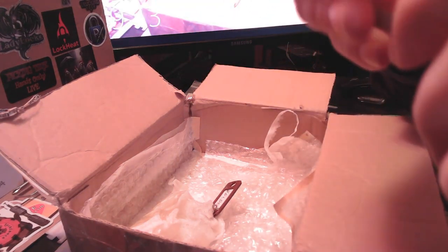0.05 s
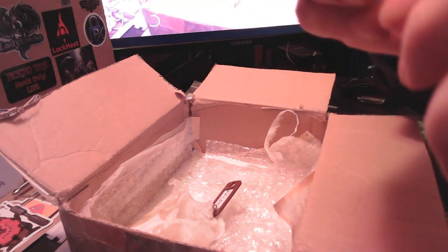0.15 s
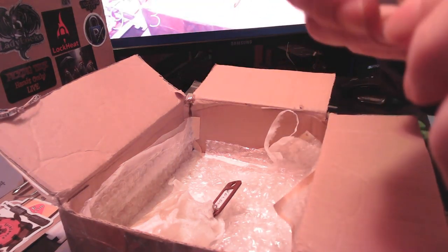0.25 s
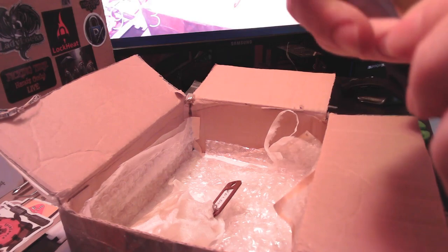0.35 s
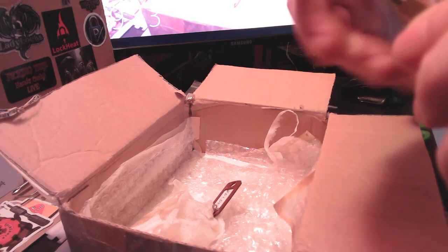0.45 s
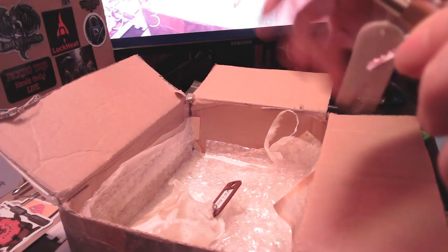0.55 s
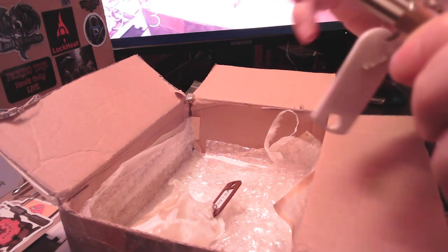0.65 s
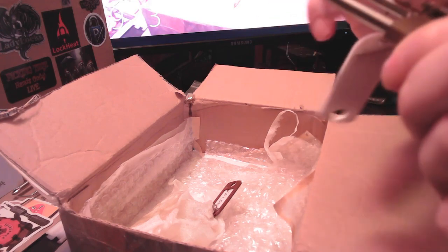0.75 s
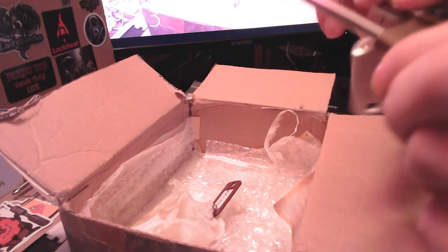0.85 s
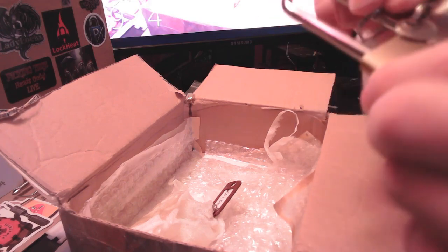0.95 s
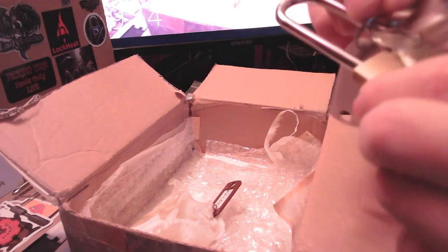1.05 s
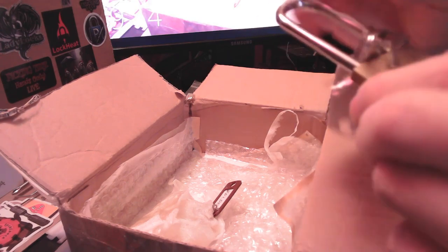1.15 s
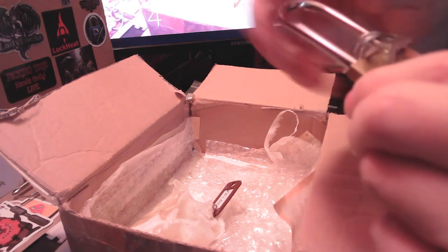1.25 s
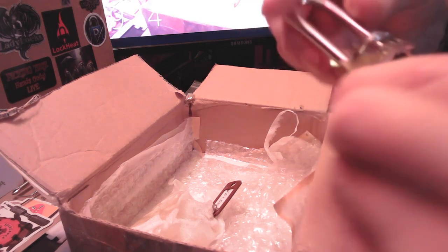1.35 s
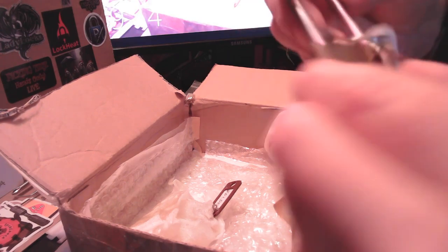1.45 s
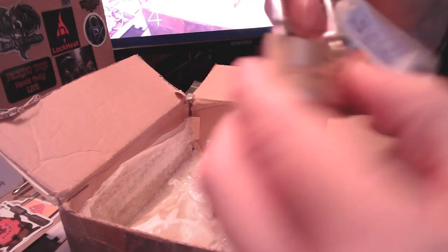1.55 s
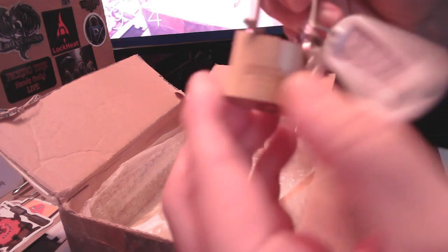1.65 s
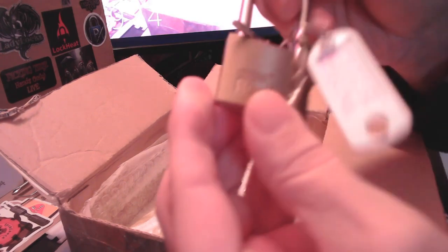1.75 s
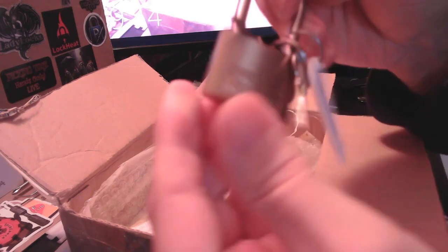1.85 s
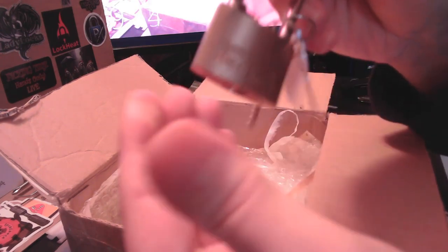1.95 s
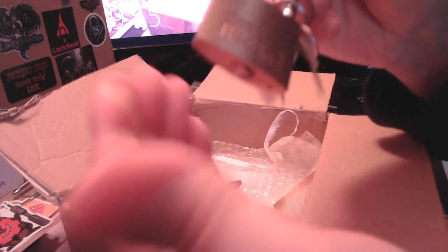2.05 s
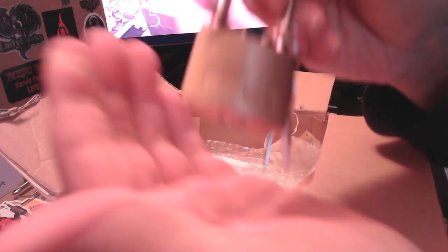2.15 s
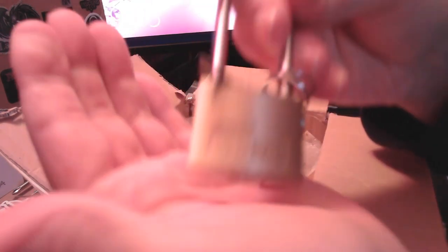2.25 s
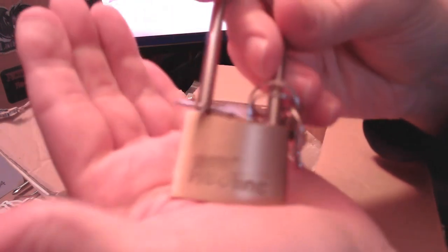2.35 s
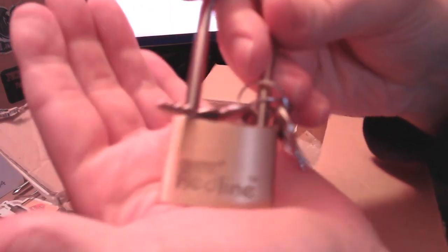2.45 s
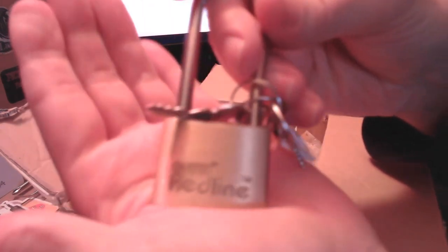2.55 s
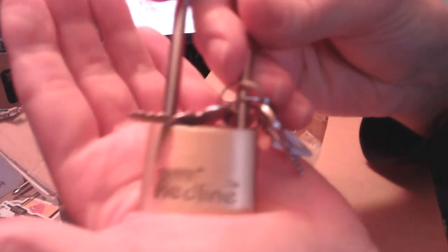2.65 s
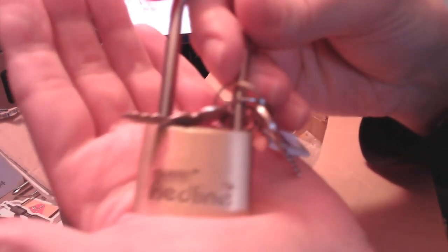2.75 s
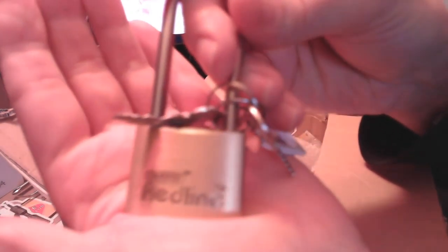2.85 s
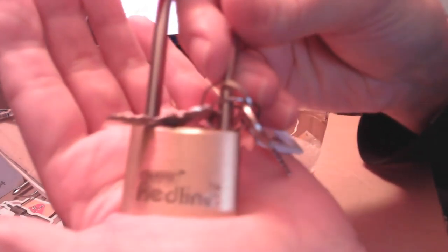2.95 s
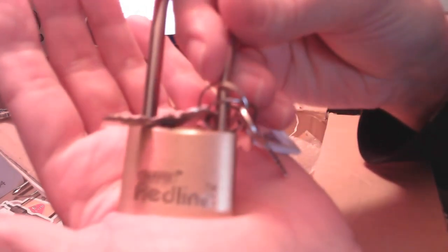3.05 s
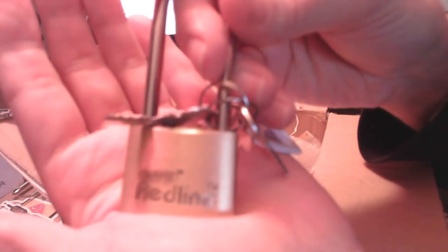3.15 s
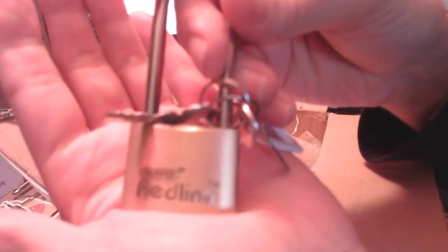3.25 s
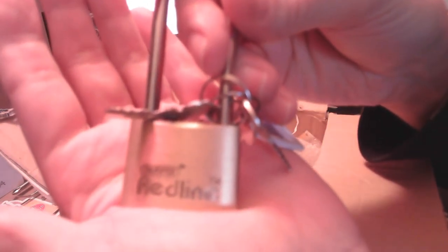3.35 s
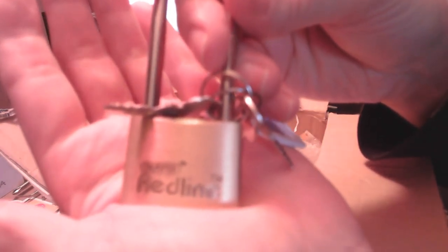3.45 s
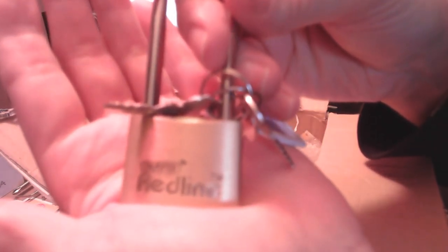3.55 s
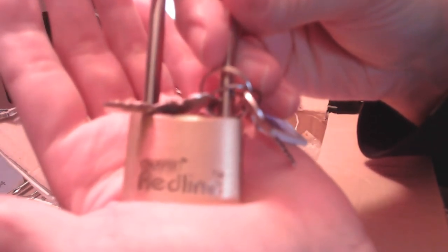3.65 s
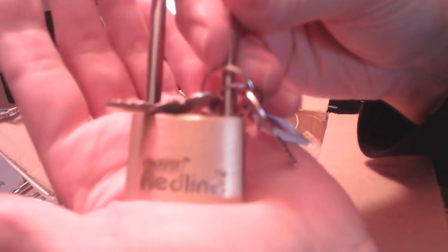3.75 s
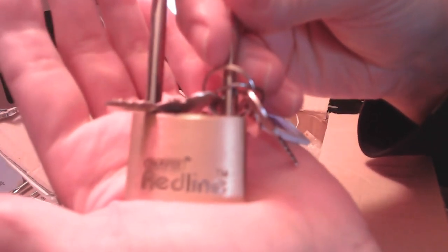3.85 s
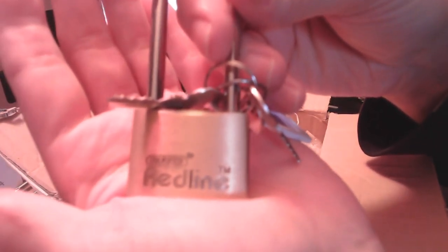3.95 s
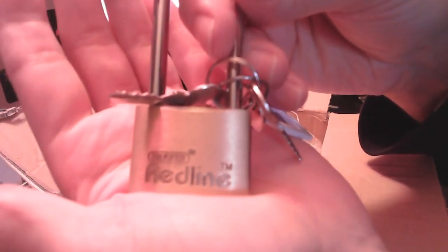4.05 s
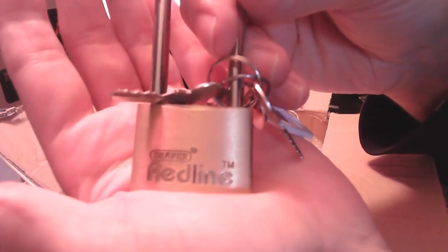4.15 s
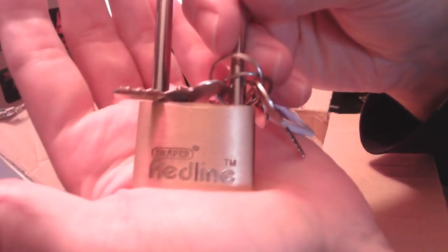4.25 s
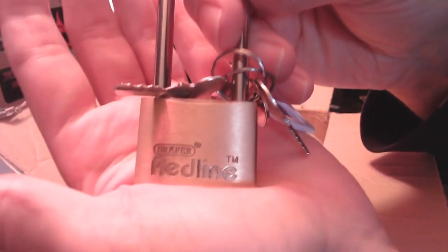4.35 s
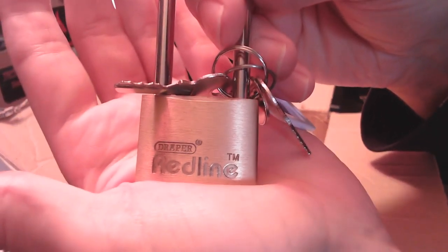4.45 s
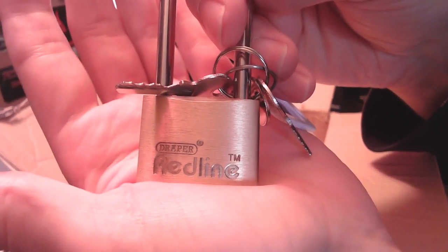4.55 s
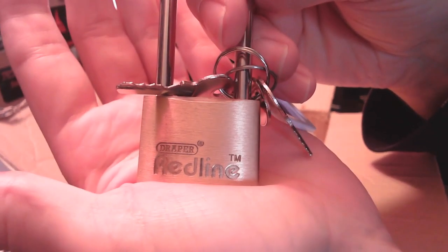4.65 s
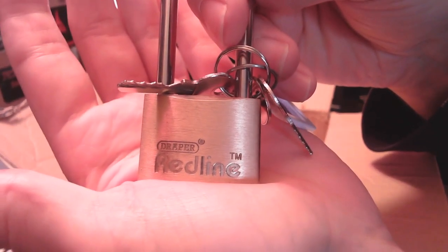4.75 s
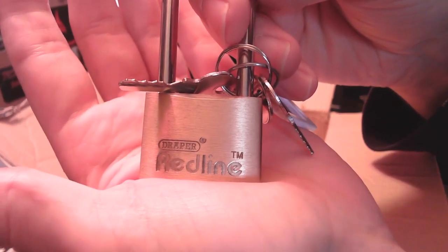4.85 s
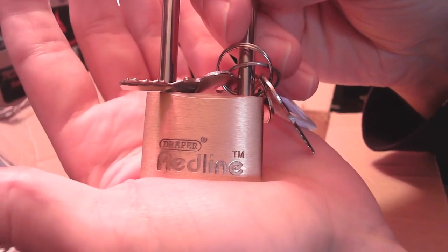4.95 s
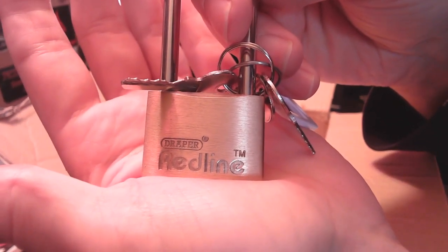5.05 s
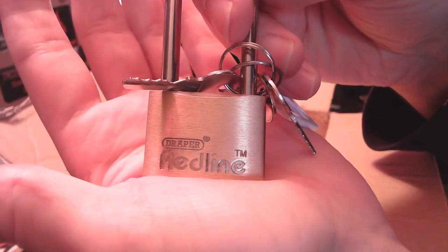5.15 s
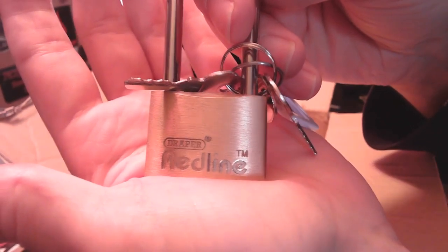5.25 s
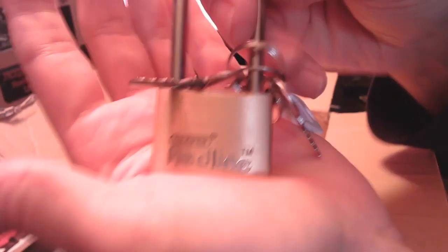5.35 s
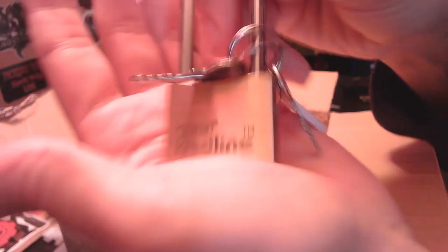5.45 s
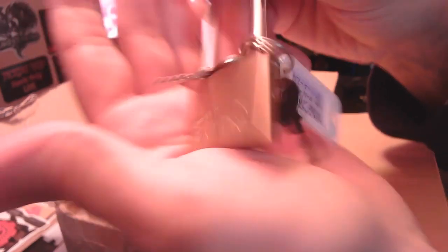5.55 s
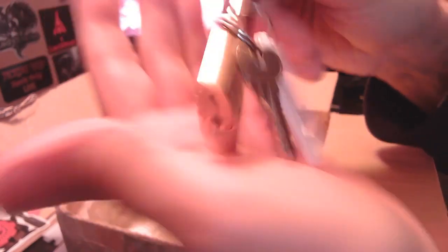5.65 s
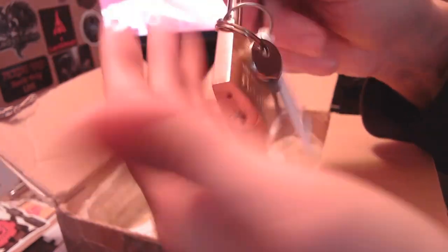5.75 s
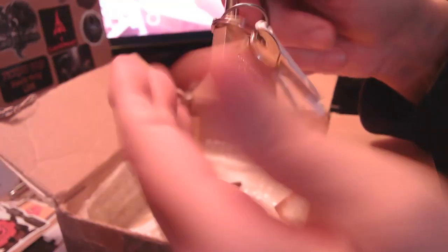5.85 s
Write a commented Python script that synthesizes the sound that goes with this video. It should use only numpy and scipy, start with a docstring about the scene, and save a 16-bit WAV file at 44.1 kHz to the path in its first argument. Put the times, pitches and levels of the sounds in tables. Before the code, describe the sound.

Close up in a small room, a bunch of keys clinks and slides with thin, bright, quickly fading rings while a hand-held padlock clacks dully. About halfway through, the metal goes still, leaving only the faint low hum and fan rush of a computer. Near the end the keys and lock rattle together once more in a short burst.

```python
"""Padlock and keys in the hands

A small brass padlock with keys on a ring is turned over close to the microphone, above a cardboard box.
The keys clink as they hit each other and scrape as they slide. The lock knocks dully because the hand
stops it from ringing. Fingers rub the metal, and the moving hands push a little air.
Behind it all, a computer's motors hum and its fan rushes in a small room."""
import sys
import numpy as np
from scipy import signal
from scipy.fft import rfft, irfft, next_fast_len
from scipy.io import wavfile

SR = 44100
rng = np.random.default_rng(int(sys.argv[2]) if len(sys.argv) > 2 else 0)


def to_wav(s):
    """Save 16-bit WAV."""
    ch = np.atleast_2d(s).T  # columns
    pcm = np.round(np.clip(ch, -1, 1) * 32767)  # PCM
    wavfile.write(sys.argv[1], SR, pcm.astype(np.int16))


N = 260039
TIME = np.arange(N) / SR

# The computer's motor tones: pitch_hz, level_db
MOTOR_TONES = [(84, -60), (119.6, -54), (361, -54.5), (619, -76.5), (1083, -78), (1444, -78), (2116, -79.5)]
# The tone colour (strength from low to high pitch) of the fan and room noise: pitch_hz, relative_db
FAN_COLOUR = [(25, 0.5), (32, 3), (45, 3.5), (62, 0), (85, -1.5), (102, -14), (125, -4), (150, -13.5),
              (300, -14.5), (640, -22.5), (1600, -28), (2400, -32), (6000, -41.5), (16000, -52)]
# How alike that noise is on the left and right: pitch_hz, likeness (1 means the same)
FAN_LIKENESS = [(30, .9), (100, 0.91), (300, 0.9), (700, 0.81), (1500, 0.56), (4000, 0.21), (12000, 0.067)]
# Hand movements that push air: start_s, length_s, relative_db
HAND_SWEEPS = [(0.0, 0.084, -32), (0.19, 0.092, -36), (0.63, 0.097, -28), (1.2, 0.16, -31.5),
               (1.92, 0.092, -35.5), (2.96, .1, -41), (4.08, .04, -43), (4.91, 0.15, -35.5),
               (5.58, 0.11, -28)]
# Keys hitting each other, with levels relative within each column:
# start_s, key_name, tick_db, middle_db, top_db, ring_s (time to fade by 60 dB)
KEY_HITS = [(0.1075, "B", -55.5, -66, -54.5, 0.064), (0.157, "A", -50.5, -60, -57, .05),
            (0.2006, "B", -59.5, -63, -66, 0.13), (0.47, "D", -53, -47, -48, .15),
            (0.5405, "A", -53, -51, -44, .11), (0.5956, "D", -41.5, -40, -35, 0.033),
            (0.6205, "B", -54, -49, -48, 0.089), (0.6872, "A", -61, -61, -49, 0.14),
            (0.7565, "A", -51, -61, -41.5, .11), (1.04, "A", -51.5, -54.5, -51, 0.044),
            (1.215, "B", -43, -37.5, -37, 0.067), (1.2354, "A", -43, -37.5, -33, 0.034),
            (1.2743, "D", -41.5, -41, -39, 0.023), (1.4075, "D", -45, -41, -30, 0.091),
            (1.4356, "A", -59, -36, -33, 0.25), (1.469, "A", -39, -42, -30.5, 0.11),
            (1.5024, "A", -44, -40, -40, 0.18), (1.6638, "B", -51, -59, -50, 0.046),
            (1.72, "B", -47, -53, -53, 0.017), (1.7737, "D", -51, -51, -47, 0.045),
            (1.812, "A", -48.5, -53, -43, .08), (1.831, "C", -48.5, -54, -42, 0.05),
            (2.191, "C", -51, -49, -51, .03), (2.2026, "C", -37, -42, -35.5, 0.084),
            (2.216, "C", -39.5, -43, -42, 0.063), (2.223, "C", -60, -36.5, -50, 0.15),
            (2.2487, "A", -49, -58, -40, .085), (2.616, "D", -41, -46, -39, 0.035),
            (2.673, "D", -48, -65, -55, .05), (2.725, "B", -44.5, -65, -48.5, .035),
            (5.7321, "C", -43.5, -50, -44, .053), (5.7675, "A", -48, -49, -49, .089),
            (5.788, "A", -50, -57, -45, 0.022), (5.8107, "B", -37.5, -39, -32.5, 0.14),
            (5.819, "B", -43, -50, -50, 0.067), (5.858, "D", -43.5, -40, -44, 0.17),
            (5.8795, "A", -43, -38, -44, 0.074)]
# The four keys, by name: middle_pitch_hz, top_pitch_hz, bending_db (compared with the other keys)
KEY_VOICES = {"A": (10600, 11995, -9.5), "B": (10540, 12540, -0.91), "C": (10343, 12465, -7),
              "D": (10660, 12690, -15.5)}
# Three groups of tones that keys ring with, low to high: pitch_hz, relative_db, share_of_ring_time
BENDING_TONES = [(3790, -5, .7), (3870, 0, 1.0), (3960, -2, .9), (4090, -7, .6)]
MIDDLE_TONES = [(10343, -7, 1.0), (10440, -10, .5), (10540, -3, .9), (10600, 0, 1.1), (10750, -7, .5)]
TOP_TONES = [(11995, 0, 1.1), (12060, -6, .7), (12150, -2, .8), (12320, -6, .5), (12470, -3, .9),
             (12545, 0, 1.1), (12650, -3, .8), (12720, -2, .9), (12960, -5, .5), (13200, -9, .5)]
# The tone colour of one key touching another: pitch_hz, relative_db
TICK_COLOUR = [(600, -20.5), (1500, -11), (3100, -5.5), (3750, 6.5), (5200, -1), (7000, 2.5), (9000, -0.5),
               (11200, -4.5), (13200, -27.5), (14200, 2.5), (16000, 0)]
# Keys sliding in the bunch: start_s, length_s, relative_db, looseness_db (how freely they ring)
KEY_SLIDES = [(0.12, .015, -62.5, -7), (0.469, 0.16, -56.5, 2.5), (0.694, .04, -58.5, 0),
              (0.75, 0.017, -54, 1.5), (0.84, 0.09, -64.5, -14), (1.19, 0.062, -54.5, 1.5),
              (1.22, 0.033, -47.5, -7), (1.32, 0.054, -60.5, -11), (1.428, .1, -49, 2),
              (1.458, 0.017, -40, 0), (1.626, 0.096, -59.5, -2), (1.73, 0.046, -47.5, -9),
              (1.883, 0.073, -56, -9), (2.092, 0.08, -63, -5), (2.224, 0.042, -57, -5),
              (2.39, 0.27, -58.5, -13), (2.614, 0.11, -52.5, -4.5), (3.66, .03, -67.5, -18),
              (5.691, 0.036, -52, -14), (5.76, .05, -58, -6), (5.837, 0.037, -42.5, -4.5)]
# The lock's body, shackle (its metal loop) and tag knocking: start_s, relative_db,
# place (0 thud, 1 clack, 2 shackle, 3 edge), falloff_db (lost per step away from that place)
LOCK_HITS = [(0.3968, -55, 2.0, 18), (0.8208, -64, 2.8, 13), (0.8565, -45, 3.1, 4.1),
             (0.8716, -48, 1.4, 12), (0.9244, -43, 1.96, 3), (1.912, -44.5, 1.55, 2),
             (1.9541, -38, 3.23, 10), (1.9715, -48, 1.45, 11), (2.0247, -60, 2.0, 3),
             (2.0499, -48.5, 2.6, 10), (2.085, -56.5, 2.7, 8.6), (2.326, -55, 2.6, 5.4),
             (2.3483, -40.5, 0.83, 11), (2.37, -55.5, 1.2, 6), (2.4084, -48, 0.61, 12),
             (2.461, -49.5, 2.9, 3.7), (2.4832, -44, 2, 3.5), (2.5967, -32.5, 2.56, 10.5),
             (2.606, -49, 2.1, 12), (2.643, -52, 1.5, 7), (2.6912, -47.5, 2.2, 9.1), (2.7447, -45, 3, 11),
             (2.778, -49.5, 2.7, 9.3), (2.899, -60, 2.45, 5.5), (3.2295, -51, 0.1, 15),
             (5.639, -54, 1.9, 3.4), (5.6544, -50, 2.8, 8), (5.6957, -49, 1.76, 7),
             (5.7194, -39.5, 1.12, 13), (5.7381, -44, 2.9, 10), (5.7458, -44.5, 1.27, 12),
             (5.7674, -54, 1.1, 10), (5.864, -51.5, 1.4, 5.4)]
# The tone colours of those four places: pitch_hz, relative_db
THUD_COLOUR = [(300, -4), (550, 1.5), (800, -5), (1100, 6), (1750, 0.5), (2100, -2), (3000, -32)]
CLACK_COLOUR = [(1200, -17), (1850, -4), (2300, 6), (2600, 4), (3000, -6), (4200, -12)]
SHACKLE_COLOUR = [(2300, -35), (3100, -12), (3700, -2.5), (4400, -4.5), (5200, -2.5), (6200, -5),
                  (7600, -9.5), (10000, -24)]
EDGE_COLOUR = [(6500, -19.5), (9000, -3.5), (11200, -4), (12800, 2), (14500, -14), (16000, -5.5)]
# Skin rubbing on the lock: start_s, length_s, level_db
FINGER_RUBS = [(1.87, 0.12, -62), (2.25, 0.022, -64.5)]


def from_db(db):
    """Turn decibels into a number to multiply a sound by."""
    return 10 ** (np.asarray(db) / 20)


def unit_level(x):
    """Scale a sound so that its average power is 1."""
    return x / np.sqrt(np.mean(x ** 2) + 1e-20)


def unit_energy(x):
    """Scale a short sound so that each channel's total energy is 1."""
    return x / np.sqrt(np.sum(x ** 2, axis=-1, keepdims=True) + 1e-20)


def at_hz(table, hz):
    """Read a table at any pitch, blending between its rows."""
    known_hz, values = np.transpose(table)
    return np.interp(np.log(hz + 1), np.log(known_hz), values)


def add(out, start_s, sound):
    """Mix a sound in at its start time."""
    start = round(start_s * SR)
    out[:, start:start + sound.shape[-1]] += sound[..., :N - start]


def convolve(x, response):
    """Let every sample of x set off its own copy of a ring or an echo."""
    return signal.fftconvolve(np.atleast_2d(x), np.atleast_2d(response), axes=-1)[:, :N]


def narrow_noise(low_hz, high_hz):
    """Make noise that lies between two pitches."""
    band = signal.butter(2, [low_hz, high_hz], "band", fs=SR, output="sos")
    return unit_level(signal.sosfilt(band, rng.standard_normal(N + SR))[SR:])


def movements(rows, rise_db_per_s, fall_db_per_s):
    """Make a loudness curve: each movement swells, holds and fades, and the strongest one leads."""
    curve = np.zeros(N)
    for start_s, length_s, db in rows:
        before_db = rise_db_per_s * np.maximum(start_s - TIME, 0)
        after_db = fall_db_per_s * np.maximum(TIME - start_s - length_s, 0)
        curve = np.maximum(curve, from_db(db - np.minimum(before_db + after_db, 120)))
    return curve


def computer(fan_db=-48, waver_radians=0.033):
    """Motors hum with slightly wavering tones over the smooth rush of a fan."""
    hum = np.zeros(N)
    for hz, db in MOTOR_TONES:
        phase = waver_radians * narrow_noise(0.9, 5.54) + rng.uniform(0, 2 * np.pi)
        hum += from_db(db) * np.sqrt(2) * np.sin(2 * np.pi * hz * TIME + phase)
    size = next_fast_len(N)
    hz = np.fft.rfftfreq(size, 1 / SR)
    shared, side = rfft(rng.standard_normal((2, size)))
    alike = at_hz(FAN_LIKENESS, hz)
    stereo = np.sqrt(1 + alike) * shared + np.sqrt(1 - alike) * side * [[1], [-1]]
    rush = irfft(from_db(at_hz(FAN_COLOUR, hz)) * stereo, size)[:, :N]
    return hum + from_db(fan_db) * unit_level(rush)


def pushed_air(left_db=0.4, right_db=-3.4):
    """The hands push slow waves of air against the microphones, almost too low to hear."""
    phase = np.angle(signal.hilbert(narrow_noise(17, 18)))
    wave = np.sqrt(2) * np.cos(phase)
    sweeps = movements(HAND_SWEEPS, rise_db_per_s=162, fall_db_per_s=162)
    air = wave * np.maximum(sweeps, from_db(-60))  # the air is never quite still
    lows_only = signal.butter(4, 25, fs=SR, output="sos")
    return signal.sosfiltfilt(lows_only, air) * from_db([[left_db], [right_db]])


def snap(colour, size=1024):
    """An object that barely rings answers a tap with one click of this tone colour."""
    strengths = from_db(at_hz(colour, np.fft.rfftfreq(size, 1 / SR)))
    # These two steps pack the click's energy at its very start.
    cepstrum = irfft(np.log(strengths))
    click = irfft(np.exp(rfft(2 * cepstrum[:size // 2], size)))
    return unit_energy(click)


def contact(colour, bounce_db, bounce_s, size=2048):
    """One hard touch is followed by uneven bounces that die away quickly."""
    bounces = rng.standard_normal(size) * rng.exponential(1, size) ** 2
    fade = from_db(-60 * TIME[:size] / bounce_s)
    force = from_db(bounce_db) * unit_energy(bounces * fade)
    force[0] += 1  # the first touch
    return unit_energy(signal.fftconvolve(force, snap(colour))[:size])


def ringing(tones, ring_s, vary_db=0, detune_hz=0, stereo_radians=1.0, size=13000):
    """Struck metal rings with tones that start together and fade; each touch varies them."""
    t = TIME[:size]
    hz, db, share = np.transpose(tones)[:, :, None]
    hz = hz + detune_hz * rng.standard_normal(hz.shape)
    db = db + vary_db * rng.standard_normal(hz.shape)
    fade_s = max(ring_s, 0.015) * share
    height = from_db(db - 60 * t / fade_s) / np.sqrt(fade_s)
    angle = 2 * np.pi * hz * t
    # Each microphone lies in its own direction, so it meets each wave at a different point.
    shift = stereo_radians * rng.standard_normal((2, len(hz)))
    sines, cosines = height * np.sin(angle), height * np.cos(angle)
    return unit_energy(np.cos(shift) @ sines + np.sin(shift) @ cosines)


def struck_key(hz, tones, ring_s, neighbours_db):
    """The struck key rings at its own pitch; the rest of the bunch joins in more briefly."""
    own = ringing([(hz, 0, 1)], ring_s)
    neighbours = ringing(tones, ring_s * 0.43, vary_db=4, detune_hz=68.6)
    return unit_energy(own + from_db(neighbours_db) * neighbours)


def key_clinks(tick_gain_db=24.5, bending_gain_db=23, middle_gain_db=27.5, top_gain_db=28.5):
    """Keys hit with a bright tick, then ring until their neighbours quiet them."""
    out = np.zeros((2, N))
    for start_s, key, tick_db, middle_db, top_db, ring_s in KEY_HITS:
        middle_hz, top_hz, bending_db = KEY_VOICES[key]
        tick = contact(TICK_COLOUR, bounce_db=11.5, bounce_s=0.042)
        bending = ringing(BENDING_TONES, ring_s, vary_db=2, detune_hz=129.6)
        middle = struck_key(middle_hz, MIDDLE_TONES, ring_s, neighbours_db=-2)
        top = struck_key(top_hz, TOP_TONES, ring_s, neighbours_db=-3)
        add(out, start_s, from_db(tick_db + tick_gain_db) * tick)
        add(out, start_s, from_db(tick_db + bending_db + bending_gain_db) * bending)
        add(out, start_s, from_db(middle_db + middle_gain_db) * middle)
        add(out, start_s, from_db(top_db + top_gain_db) * top)
    return out


def sliding_keys(touches_per_s=800, spread_db=3.5, catch_db=2.5, easy_slide_db=-56):
    """Key teeth and the key ring slip over each other in tiny touches that keep the keys ringing."""
    sizes = from_db(spread_db * np.minimum(rng.exponential(1, N), 3.5)) * rng.choice([-1, 1], N)
    catching = from_db(catch_db * narrow_noise(15, 60))  # the keys catch and slip unevenly
    touches = unit_level(sizes * catching * (rng.random(N) < touches_per_s / SR))
    scrapes, shakes = [], []
    for start_s, length_s, db, looseness_db in KEY_SLIDES:
        extra_db = 0.35 * (db - easy_slide_db)  # a harder slide shakes the keys loose
        scrapes.append((start_s, length_s, db))
        shakes.append((start_s, length_s, db + extra_db + looseness_db))
    slopes = dict(rise_db_per_s=376.5, fall_db_per_s=226)
    scrape = touches * movements(scrapes, **slopes)
    shake = touches * movements(shakes, **slopes)
    out = from_db(-2) * convolve(scrape, snap(TICK_COLOUR))
    layers = [(scrape, -16.5, BENDING_TONES), (shake, -10, MIDDLE_TONES), (shake, 0, TOP_TONES)]
    for force, db, tones in layers:
        # Keys that stay in touch quiet each other, so they ring only briefly.
        ring = ringing(tones, ring_s=0.039, vary_db=1.5, stereo_radians=1.2)
        out = out + from_db(db) * convolve(force, ring)
    return out


def lock_knocks(gain_db=25):
    """The hand muffles the lock, so it knocks dryly; where it is hit sets the mix of four colours."""
    out = np.zeros((2, N))
    hz = np.linspace(200, 16000, 80)
    places = (THUD_COLOUR, CLACK_COLOUR, SHACKLE_COLOUR, EDGE_COLOUR)
    shapes = unit_energy(from_db([at_hz(colour, hz) for colour in places]))
    for start_s, db, place, falloff_db in LOCK_HITS:
        steps_away = np.abs(np.arange(len(places)) - place)
        power = from_db(db - falloff_db * steps_away) ** 2 @ shapes ** 2
        colour = np.transpose([hz, 10 * np.log10(power)])
        knock = contact(colour, bounce_db=-10, bounce_s=0.012)
        add(out, start_s, from_db(gain_db) * np.sqrt(power.sum()) * knock)
    return out


def rubbing_fingers():
    """Fingers slide along the lock with a soft, dull rustle."""
    rustle = narrow_noise(low_hz=480, high_hz=620)
    return rustle * movements(FINGER_RUBS, rise_db_per_s=220, fall_db_per_s=220)


def small_room(x, near_db=-5, near_s=0.057, room_db=-13, room_s=0.22, lag_s=0.000031, tilt_db=1.5):
    """Sound bounces quickly off the hands, box and screen, then faintly around the room."""
    t = TIME[:16000]
    near = unit_energy(rng.standard_normal((2, len(t))) * from_db(-60 * t / near_s) * (t > 0.0005))
    room = unit_energy(rng.standard_normal((2, len(t))) * from_db(-60 * t / room_s) * (t > 0.007))
    echoes = convolve(x, from_db(near_db) * near + from_db(room_db) * room)
    # The left microphone is a little nearer, so the right side is later and quieter.
    delay = np.exp(-2j * np.pi * np.fft.rfftfreq(N, 1 / SR) * lag_s)
    direct = np.array([x[0], irfft(rfft(x[1]) * delay, N)])
    return (direct + echoes) * from_db([[tilt_db], [-tilt_db]])


def scene():
    """The keys and lock are in front, with the computer behind."""
    handling = key_clinks() + lock_knocks() + sliding_keys() + rubbing_fingers()
    return small_room(handling) + computer() + pushed_air()


def record(dry):
    """The very highest pitches are cut off steeply."""
    cutoff_hz = 15900
    return signal.sosfilt(signal.ellip(10, 0.2, 80, cutoff_hz, fs=SR, output="sos"), dry)


dry = scene()
out = record(dry)
to_wav(out)
```